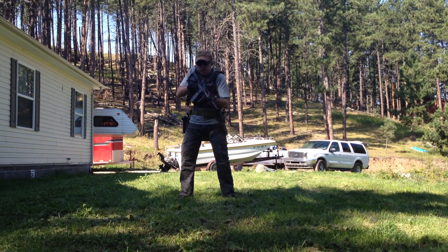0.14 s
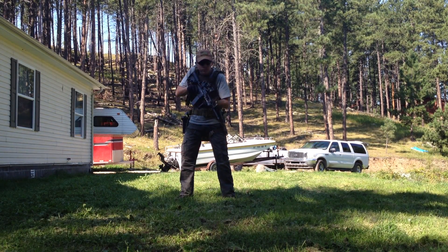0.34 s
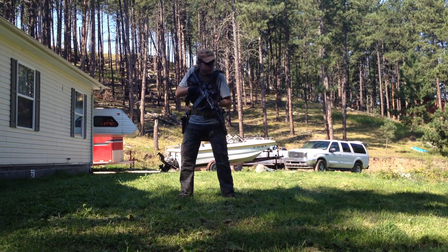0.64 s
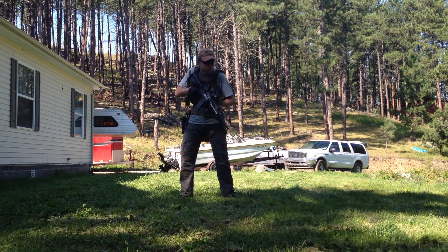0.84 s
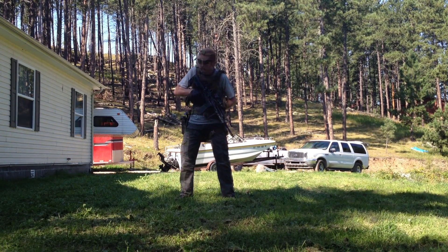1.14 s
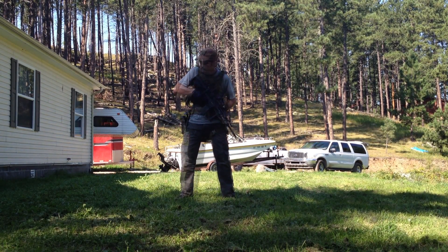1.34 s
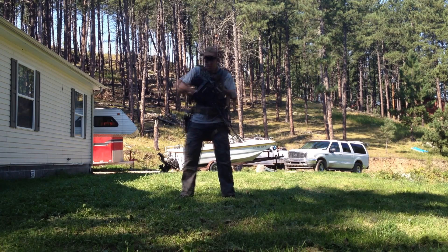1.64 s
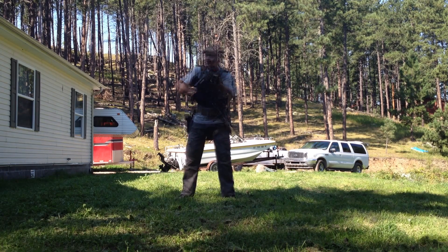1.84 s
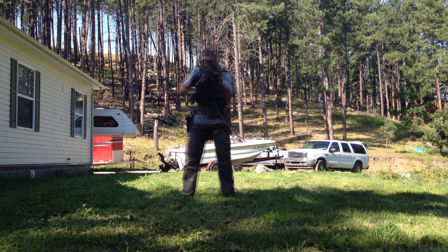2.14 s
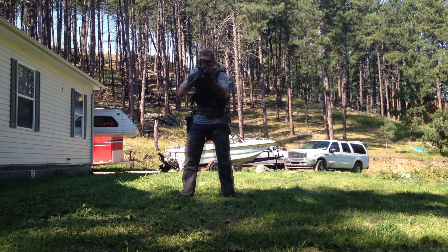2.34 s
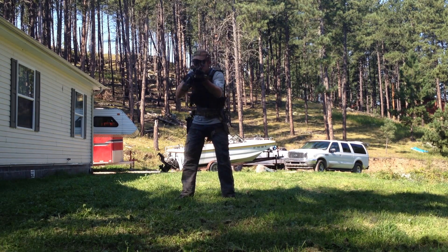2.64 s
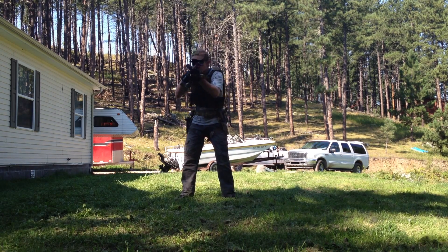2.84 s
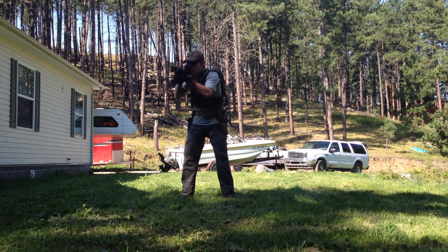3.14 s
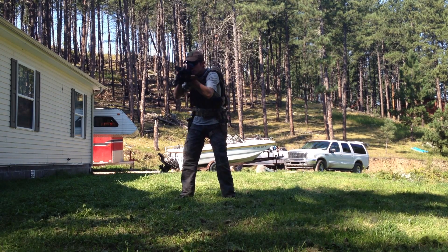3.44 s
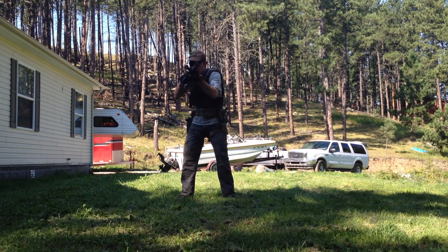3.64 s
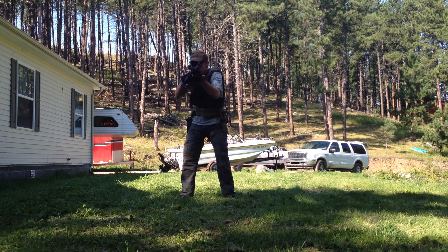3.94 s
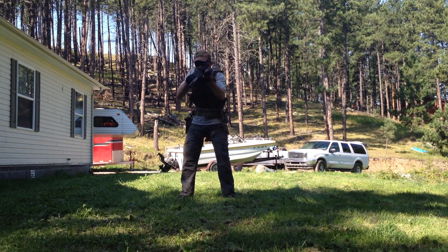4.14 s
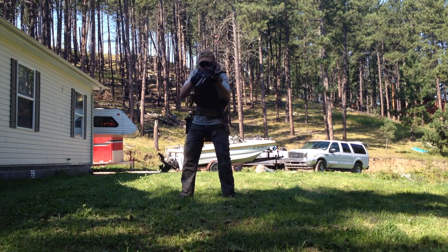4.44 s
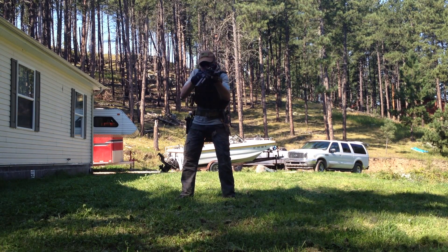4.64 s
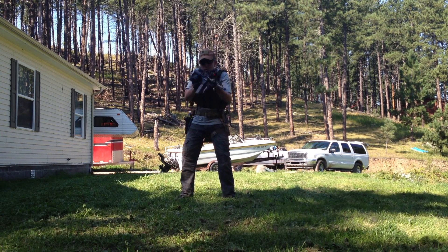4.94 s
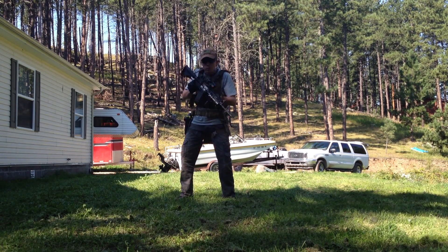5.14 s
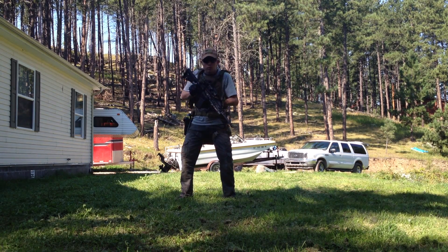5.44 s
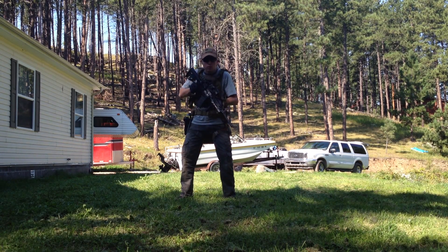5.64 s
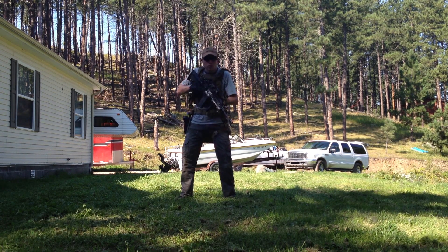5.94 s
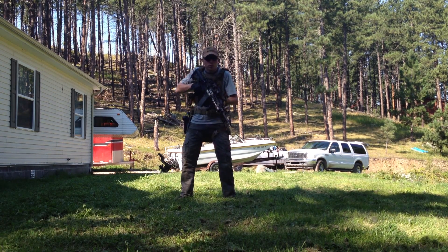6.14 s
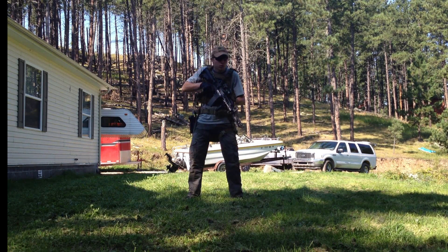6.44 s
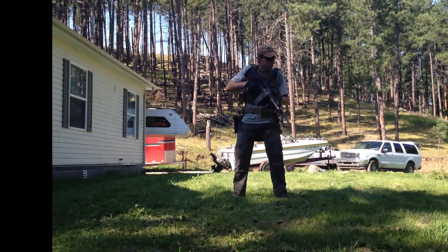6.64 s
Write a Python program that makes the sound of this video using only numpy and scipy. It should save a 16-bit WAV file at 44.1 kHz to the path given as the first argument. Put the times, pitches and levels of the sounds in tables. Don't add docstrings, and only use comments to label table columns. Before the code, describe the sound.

Almost two seconds of near silence: tiny cricket chirps, light rustling clicks, faint hum. Then a gas airsoft rifle fires fifteen sharp pops from some metres away, mostly around a seventh of a second apart with short gaps. Close to the microphone, pellets crack and knock a thin target, briefly ducking the level. The wooded slope answers with a thin fading wash. Afterwards there are only soft clicks, crickets and breeze.

```python
import sys
import numpy as np
from scipy import signal
from scipy.fft import rfft, irfft, next_fast_len
from scipy.io import wavfile
from scipy.ndimage import uniform_filter1d, map_coordinates

SR = 44100
rng = np.random.default_rng(int(sys.argv[2]) if len(sys.argv) > 2 else 0)


def dump_mix(stems):
    frames = np.atleast_2d(stems).T
    limited = np.clip(frames, -1, 1)
    pcm = np.round(limited * 32767).astype(np.int16)
    wavfile.write(sys.argv[1], SR, pcm)


def linear_from_db(decibels):
    return 10 ** (np.asarray(decibels, float) / 20)


N = 298557


def unit(x):
    return x / np.sqrt(np.mean(x ** 2) + 1e-20)


def along(points, hz):
    f, v = np.transpose(points)
    return np.interp(np.log(hz + 1), np.log(f + 1), v)


def wobble(rate_hz, size=N):
    knots = rng.standard_normal(int(size * rate_hz / SR) + 4)
    return map_coordinates(knots, [np.arange(size) * rate_hz / SR])


def filtered(x, response):
    m = next_fast_len(len(x) + 4096)
    return irfft(rfft(x, m) * response(np.fft.rfftfreq(m, 1 / SR)), m)[:len(x)]


def add(track, start_s, sound):
    part = track[round(start_s * SR):][:len(sound)]
    part += sound[:len(part)]


def sweep(hz):
    return np.sin(2 * np.pi * np.cumsum(hz) / SR)


def ring(modes, t, scatter_db, spread=0):
    t = np.abs(t) * (t > 0)
    out = 0
    for hz, db, t60_s in modes:
        level = linear_from_db(db + rng.normal(0, scatter_db) - 60 * t / t60_s)
        out = out + level * np.sin(2 * np.pi * hz * t + rng.normal(0, spread))
    soft = 1 - np.exp(-t / .0001) if spread else 1
    return soft * out


# offset_s [s from pop], level_db [dB]
LEAD_INS = [
    (-.004, -16.5),
    (-.0018, -10),
    (-.0009, -10.5),
]
# pitch_hz [Hz], level_db [dB], t60_s [s]
BARREL_MODES = [(3370, -7, 0.0055), (2490, -17, 0.0088), (4700, -21.5, .006), (7200, -10, 0.0044),
                (1040, -24, 0.0065), (12500, -10.5, .003)]


def muzzle_pop(t, hammer_db):
    u = t / .000026
    puff = .24 * (1 - u) * np.exp(-u * u / 2)
    swell = 0.93 * np.cos(2 * np.pi * 3600 * t) * np.exp(-np.abs(t) / 0.0002) * (t < 0)
    pop = puff + swell + 0.81 * ring(BARREL_MODES, t + .00007, scatter_db=1.17) * (t > 0)
    for offset_s, level_db in LEAD_INS:
        since = t - offset_s - rng.normal(0, .0001)
        scrape = rng.standard_normal(len(t)) * linear_from_db(-60 * np.abs(since) / .003) * (since > 0)
        tick = ring(BARREL_MODES, since, scatter_db=0.0) + .4 * scrape
        pop += linear_from_db(level_db + hammer_db) * tick
    return pop


# pitch_hz [Hz], level_db [dB], t60_s [s]
RECEIVER_MODES = [(2665, -7.5, .06), (2907, -9.5, .07), (3941, -4.5, .06), (4269, -7.5, .06),
                  (5840, -12, .05), (6364, -6, 0.069), (7460, -16, .05)]
# pitch_hz [Hz], level_db [dB]
CLANK_MODES = [(1800, -9), (2700, -5), (3300, -3.5), (4000, -5), (4600, -6), (6400, -9.5), (9000, -17.5),
               (13000, -21)]
# offset_s [s], level_db [dB]
BOLT_CONTACTS = [(0, 1.5), (.0015, -2), (.0023, -0.5), (.0065, -5.5), (.0145, -6.5), (0.0194, -2.5),
                 (.0225, -5.5)]


def bolt(t):
    clank = 0
    for offset_s, contact_db in BOLT_CONTACTS:
        level = linear_from_db(contact_db + rng.normal(0, 1.3))
        modes = [(hz * rng.normal(1, .04), db, .006) for hz, db in CLANK_MODES]
        clank = clank + level * ring(modes, t - offset_s, scatter_db=3.5, spread=3.2)
    return 3.4 * lawn(clank, -2.9) + 0.9 * ring(RECEIVER_MODES, t, scatter_db=4.5, spread=2)


# start_s [s], pop_db [peak dB as heard], yard_db [dB re pop], bolt_db [dB re pop]
SHOTS = [(1.9355, -7.5, -20, -24), (2.0936, -6, -23.5, -26), (2.2385, -9.5, -23, -26),
         (2.5, -5.5, -23, -33), (2.671, -15.5, -24, -19.5), (2.807, -15.5, -19.5, -21.5),
         (3.0581, -8, -26.5, -25), (3.216, -7.5, -24.5, -26.5), (3.3532, -12.5, -25, -16.5),
         (3.6109, -8.5, -25, -34.5), (3.7954, -15, -27, -50), (4.0176, -17, -28, -27.5),
         (4.3414, -11.5, -24.5, -27.5), (4.5138, -6.5, -27, -27.5), (4.662, -6.5, -26.5, -24.5)]


def rifle(gain):
    GROUND_DB, LOW_AIM_DB, AIM_UP_S = -2.5, 3.2, 2.4
    SOFT_PULL_S, SOFT_PULL_DB = 2.807, -21.5
    PRE_S = .006
    out = np.zeros(N)
    t = np.arange(SR // 12) / SR - PRE_S
    for s, pop_db, yard_db, bolt_db in SHOTS:
        db = pop_db - gain[round(s * SR)]
        pop = muzzle_pop(t, SOFT_PULL_DB * (abs(s - SOFT_PULL_S) < .05))
        add(out, s - PRE_S, linear_from_db(db) * lawn(pop, GROUND_DB + LOW_AIM_DB * (s < AIM_UP_S)))
        add(out, s, linear_from_db(db + yard_db) * yard())
        home_s = s + .0556 + .0016 * (s - 1.9)
        level = linear_from_db(db + bolt_db)
        add(out, home_s - PRE_S, level * bolt(t))
        add(out, home_s, level * .6 * yard())
    s, pop_db, yard_db, _ = np.transpose(SHOTS)
    return out + slope(pop_db + yard_db - gain[np.round(s * SR).astype(int)] - 19.0)


# start_s [s], force_db [dB of gain drop], crack_hz [Hz], knock_hz [Hz], knock_db [dB]
PELLETS = [(2.1443, 2, 2700, 1090, -10.5), (2.545, 9, 4300, 744, -17), (2.7165, 8, 2180, 446, -8),
           (2.8469, 6, 5260, 433, -8), (3.1048, 2.5, 4120, 1390, -9.5), (3.2643, 6, 4700, 769, -7.5),
           (3.4017, 9, 6800, 1350, -5.5), (3.6545, 12.5, 4340, 790, -21.5), (3.8414, 6, 3750, 331, -7.5),
           (4.5646, 1.3, 2490, 1140, -5.5), (4.7145, 2, 4030, 1092, -1.5)]


def target(gain):
    CRACK_DB, HALF_FORCE_DB, CRACK_S = -1.13, 1.2, 0.00062
    EDGE_HZ, EDGE_LOSS_DB_PER_HZ = 800, 0.014
    GLANCE_DB, BUZZ_DB, RATTLE_S = -4, 8, .03
    THUMP_DB, THUMP_DB_PER_FORCE_DB = -17.5, 1.103
    out, t = np.zeros(N), np.arange(SR // 20) / SR
    for s, force, hz, knock_hz, knock_db in PELLETS:
        heard_db = gain[round(s * SR)]
        edge = knock_hz > 1.2 * EDGE_HZ
        db = CRACK_DB + 20 * np.log10(force / (force + HALF_FORCE_DB)) + GLANCE_DB * edge
        thump_db = db + THUMP_DB + THUMP_DB_PER_FORCE_DB * force
        thump_db -= EDGE_LOSS_DB_PER_HZ * max(knock_hz - EDGE_HZ, 0)

        face = [(hz, db, .012), (hz * 1.6, db - 8, .006), (hz * 2.6, db - 11, .004), (13000, db - 15, .004)]
        crack = -np.exp(-(t / CRACK_S) ** 2) * ring(face, t, scatter_db=2.63)
        knock = ring([(knock_hz, knock_db + 6.0, 2.7 / knock_hz)], t - .0001, scatter_db=1.98)
        b, a = signal.butter(1, knock_hz / 3, "high", fs=SR)
        knock = signal.lfilter(b, a, knock)
        thump = ring([(200, thump_db + 4, 0.018)], t - .0011, scatter_db=2.7)
        rattle = filtered(rng.standard_normal(len(t)), lambda f: 1 / (1 + (f / 7000) ** 4))
        rattle = rattle * linear_from_db(db - 18 + BUZZ_DB * edge - 60 * t / RATTLE_S)
        add(out, s, (crack + knock + thump + rattle) / linear_from_db(heard_db))
        add(out, s, linear_from_db(db - 34.0 - heard_db) * yard()[300:])
    return out


def gain_db():
    clock = np.arange(0, N / SR, 1 / 2000)
    start_s, force_db = np.array(PELLETS)[:, :1], np.array(PELLETS)[:, 1]
    after = clock - start_s - .003
    back = 0.31 * np.exp(-np.abs(after) / 0.11) + .55 * np.exp(-np.abs(after) / .9)
    drop_db = np.dot(force_db, back * np.clip(after / .002, 0, 1))
    return np.interp(np.arange(N) / SR, clock, -drop_db)


def lawn(direct, db):
    b, a = signal.butter(1, [2300, 5600], "band", fs=SR)
    late = np.pad(direct, (round(.00495 * SR), 0))[:len(direct)]
    return direct + linear_from_db(db) * signal.lfilter(b, a, late)


# pitch_hz [Hz], density_db [dB per Hz]
YARD_COLOUR = [(80, -30), (190, 0), (480, -17.5), (650, -9), (1000, -6), (1500, -7.5), (1850, -6),
               (3500, -7), (4800, -6.5), (5200, -15), (7200, -12), (9500, -20.5), (13000, -16.5),
               (15100, -20.5), (15500, -44.5)]
# pitch_hz [Hz], t60_s [s]
NEAR_DECAY = [(150, 0.16), (1000, .22), (4000, .23), (12000, .21)]


def yard():
    PATCH_DB = 3.8
    hz, t, z = signal.stft(rng.standard_normal(SR // 4), SR, nperseg=256)
    patches = uniform_filter1d(rng.standard_normal(z.shape), size=4, axis=1)
    z = z * linear_from_db(PATCH_DB * unit(patches))
    fall_db = along(YARD_COLOUR, hz)[:, None] - 60 * t / along(NEAR_DECAY, hz)[:, None]
    wash = signal.istft(z * linear_from_db(fall_db), SR, nperseg=256)[1]
    t = np.arange(len(wash)) / SR
    walls = 1 + .5 * np.exp(-((t - .0175) / 0.0015) ** 2) + .5 * np.exp(-((t - .031) / .005) ** 2)
    arrive = np.clip((t - .002) / 0.0079, 0, 1) * walls
    wash = wash * arrive * linear_from_db(2.7 * wobble(700, size=len(t)))
    return wash / np.sqrt(np.mean(wash[350:1500] ** 2))


# pitch_hz [Hz], t60_s [s]
FAR_DECAY = [(150, .5), (600, 0.91), (1200, 1.7), (2200, 1.45), (4500, 1), (6500, 0.8), (12000, 0.4)]


def slope(bangs_db):
    hz, t, z = signal.stft(rng.standard_normal(N), SR, nperseg=512)
    since = t - .03 - np.array(SHOTS)[:, :1, None]
    fall_db = bangs_db[:, None, None] - 60 * np.abs(since) / along(FAR_DECAY, hz)[:, None]
    fall = linear_from_db(fall_db) * np.clip(since / .04, 0, 1)
    colour = unit(linear_from_db(along(YARD_COLOUR, hz)))[:, None]
    return signal.istft(z * np.linalg.norm(fall, axis=0) * colour, SR, nperseg=512)[1][:N]


# start_s [s], peak_db [dB], centre_hz [Hz]
GEAR_TICKS = [(0.869, -66, 2170), (1.179, -62.5, 4800), (1.339, -64, 1940), (1.559, -63, 4530),
              (1.644, -61, 5000), (1.664, -57, 870), (1.689, -56.5, 2170), (1.728, -62.5, 834),
              (1.89, -62, 2250), (4.169, -63, 2370), (5.154, -60, 3330), (5.744, -62.5, 1913),
              (6.1, -59.5, 2040)]
# start_s [s], peak_db [dB], centre_hz [Hz]
TRIGGER_SLACK = [
    (3.6026, -34.5, 3000),
]


def gear(gain):
    out, t = np.zeros(N), np.arange(SR // 20) / SR
    for s, db, hz in [*GEAR_TICKS, *TRIGGER_SLACK]:
        noise = rng.standard_normal(len(t))
        rustle = filtered(noise, lambda f: f / (f + 900) / (1 + (f / 3800) ** 3))
        rustle = 2.6 * rustle * linear_from_db(-60 * t / 0.079)
        click = ring([(hz, .8, .03), (hz * 1.35, -4, .02)], t, scatter_db=0.0)
        add(out, s, linear_from_db(db - gain[round(s * SR)]) * (click + rustle))
    return out


def strokes(rows, pitch_hz, boost_db):
    out, u = np.zeros(N), np.linspace(0, 1, len(pitch_hz))
    for s, db in rows:
        tone = sweep(pitch_hz * rng.normal(1, 0.0064))
        level = linear_from_db(db + boost_db + 2.6 * wobble(190, size=len(u)))
        add(out, s - .002, level * np.sin(np.pi * u) ** 0.22 * tone)
    return out


# start_s [s], peak_db [dB]
CHIRPS = [(.0243, -62), (.2618, -60), (.4823, -61), (.7163, -59.5), (.9532, -60), (1.1618, -62),
          (1.3904, -61.5), (1.5998, -63), (1.8048, -63), (1.8214, -65), (5.1229, -62), (5.3234, -59.5),
          (5.5313, -60.5), (5.7679, -62.5), (5.9788, -60.5), (6.2113, -60.5), (6.6274, -60.5)]
# start_s [s], peak_db [dB]
HURRIED = [
    (6.4293, -60.5),
    (6.4444, -67),
]
# start_s [s], peak_db [dB]
LOW_CALLS = [(.165, -69), (.53, -69), (.855, -72), (1.155, -69), (1.49, -69.5), (5.44, -75), (5.86, -77),
             (6.13, -77), (6.5, -83)]


def cricket():
    PAIR_S, SECOND_DB, TRILL_S = .0375, -0.8, 0.033
    u = np.linspace(0, 1, round(.024 * SR))
    near = [*CHIRPS, *HURRIED, *np.add(CHIRPS, [PAIR_S, SECOND_DB])]
    low = [(s + k * TRILL_S, db) for s, db in LOW_CALLS for k in range(3)]
    out = strokes(near, 4530 + 2200 * u - 2500 * u ** 2, boost_db=-5)
    out += strokes(low, 4500 - 400 * u, boost_db=-6.0)
    echo = rng.standard_normal(SR // 8) * linear_from_db(-60 * np.arange(SR // 8) / SR / 0.11)
    return out + linear_from_db(-7.5) * signal.fftconvolve(out, echo / np.linalg.norm(echo))[:N]


def bird():
    START_S, RISE_S, HOLD_S, FALL_S, LEVEL_DB = 5.62, .14, .14, .08, -79
    t = np.arange(N) / SR - START_S
    shape = np.interp(t, np.cumsum([0, RISE_S, HOLD_S, FALL_S]), [0, 1, 1, 0])
    level = linear_from_db(LEVEL_DB + 1.3 + 2.6 * wobble(30))
    return shape * level * sweep(3420 - 300 * t + 40 * wobble(60))


def narrow(hz, width_hz):
    return unit(filtered(rng.standard_normal(N), lambda f: np.exp(-((f - hz) / width_hz) ** 2)))


# pitch_hz [Hz], density_db [dB per Hz]
AIR_COLOUR = [(24, -41), (40, -17.5), (79, -2), (176, 1), (305, -3.5), (363, -5), (585, -12.5),
              (873, -10.5), (3830, -18), (4680, -13.5), (5310, -20.5), (7730, -22.5), (9690, -30),
              (14800, -21), (16000, -41.5)]
# pitch_hz [Hz], wander_hz [Hz], waver_db [dB], level_db [dB], share [dB per dB thinness]
HUM_TONES = [(84, 2.6, 0.7, -0.2, -1.3), (191, 30, 2.5, -1.5, 0.26), (360, 14, 2.5, -6.5, 0.36)]
# start_s [s], level_db [dB], thinness_db [dB]
MACHINE = [(0, -72, -1), (.3, -80, -2.5), (.36, -79, 20), (.45, -77.5, -3), (1.2, -76.5, -1.5),
           (1.9, -78.5, -1), (2.1, -85.5, 4), (4.9, -84, 14.5), (5.4, -82, 5), (5.58, -74, 15),
           (5.82, -75.5, 9), (5.95, -81, 8), (6.3, -75.5, 10), (6.77, -75.5, 7)]
# pitch_hz [Hz], width_hz [Hz], level_db [dB]
FAR_CRICKETS = [(4300, 300, -89.5), (4800, 500, -88)]


def air():
    t = np.arange(N) / SR
    breeze = unit(filtered(rng.standard_normal(N), lambda f: linear_from_db(along(AIR_COLOUR, f))))
    out = linear_from_db(-68 + .5 * wobble(1.5)) * breeze
    s, level_db, thin_db = np.transpose(MACHINE)
    for hz, wander_hz, waver_db, db, share in HUM_TONES:
        tone_db = np.interp(t, s, level_db + db + share * thin_db) - gain_db() + waver_db * wobble(9)
        out += linear_from_db(tone_db) * np.sqrt(2) * sweep(hz + wander_hz * wobble(30))
    for hz, width_hz, db in FAR_CRICKETS:
        out += linear_from_db(db + 3 * wobble(25)) * narrow(hz, width_hz)
    return out


def scene():
    gain = gain_db()
    quiet = air() + bird() + cricket()
    high_pass = signal.butter(4, 130, "high", fs=SR, output="sos")
    bangs = signal.sosfilt(high_pass, rifle(gain) + target(gain))
    return (bangs + gear(gain) + quiet)[None]


def low_pass(x):
    return signal.sosfilt(signal.butter(12, 16500, fs=SR, output="sos"), x)


def record(dry):
    x = dry[0] * linear_from_db(gain_db())
    x = x / (1 + np.abs(x / 0.66) ** 4) ** (1 / 4)
    response_db = [(40, -11.5), (70, -4.5), (15000, 1.5), (15400, -15.5), (16400, -18.5), (16900, -66.0)]
    x = filtered(x, lambda f: linear_from_db(along(response_db, f)))
    return low_pass(x[None])


dry = scene()
out = record(dry)
dump_mix(out)
```